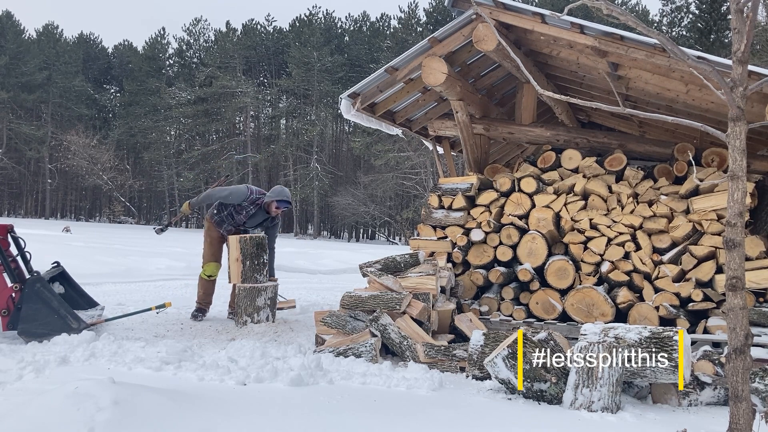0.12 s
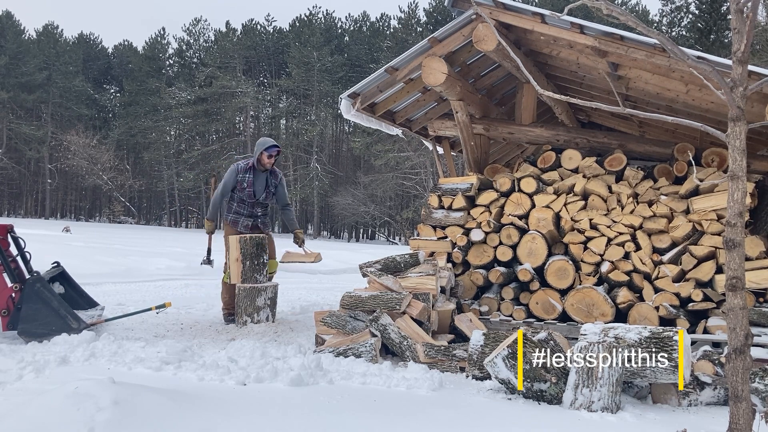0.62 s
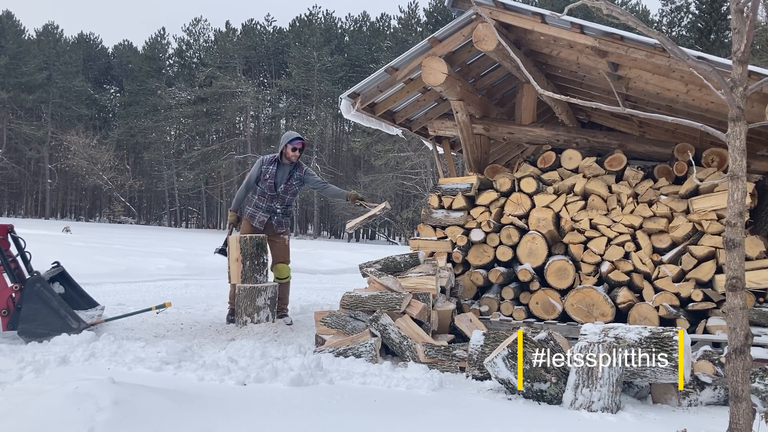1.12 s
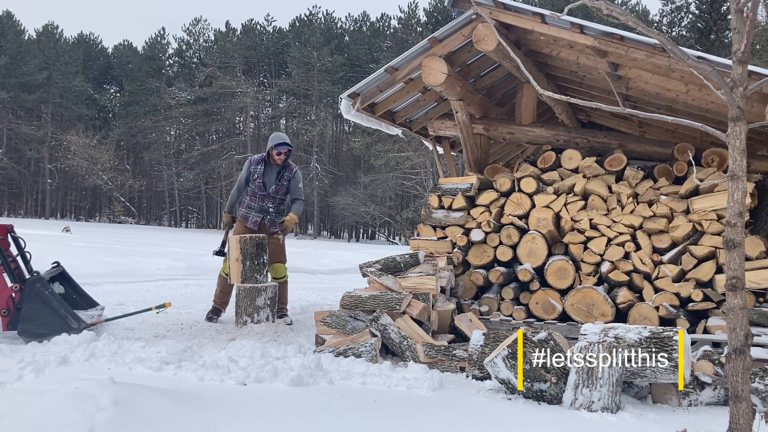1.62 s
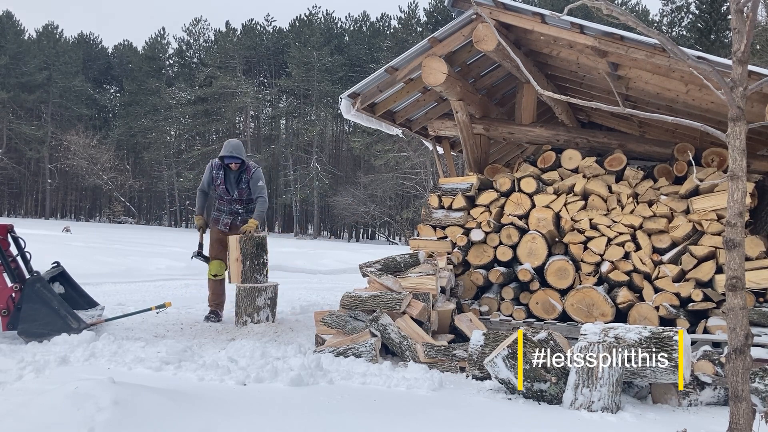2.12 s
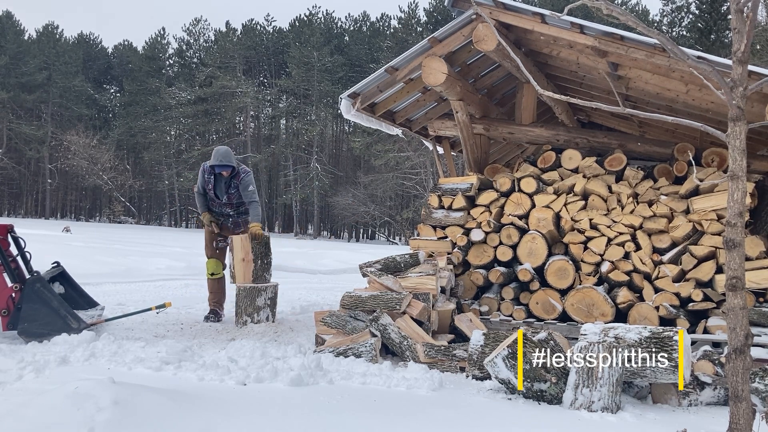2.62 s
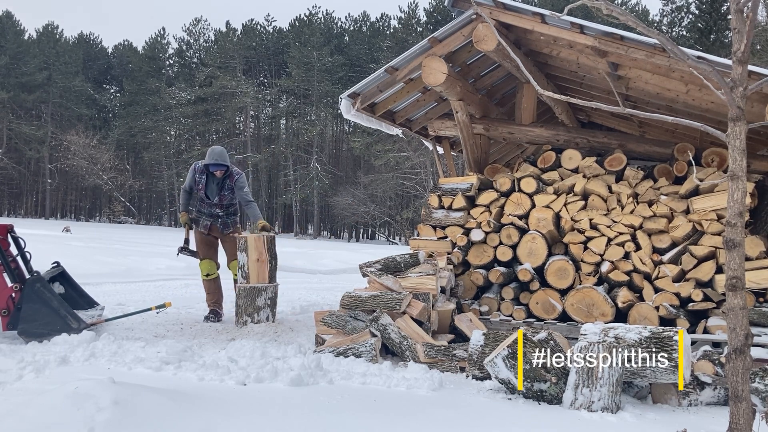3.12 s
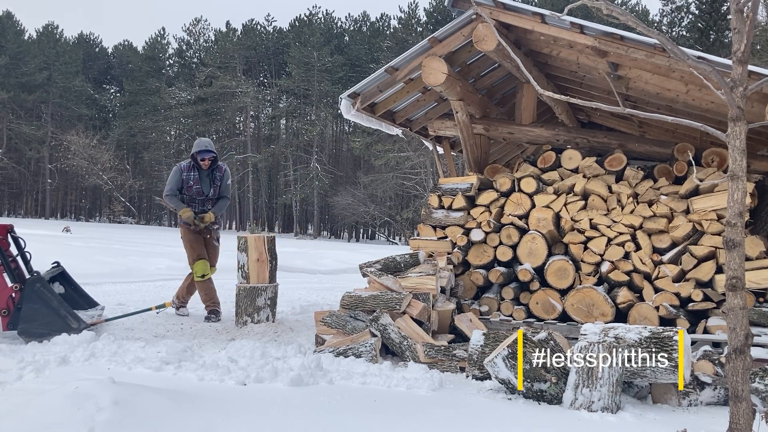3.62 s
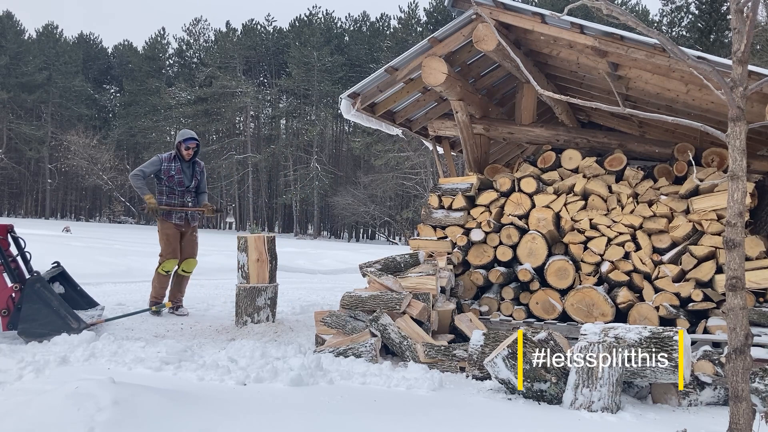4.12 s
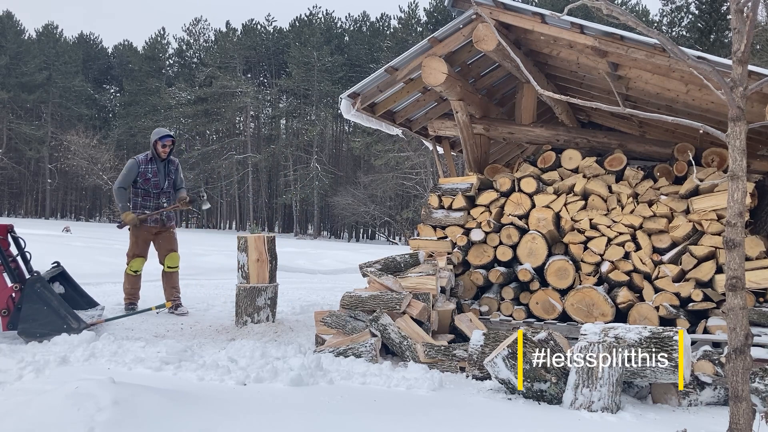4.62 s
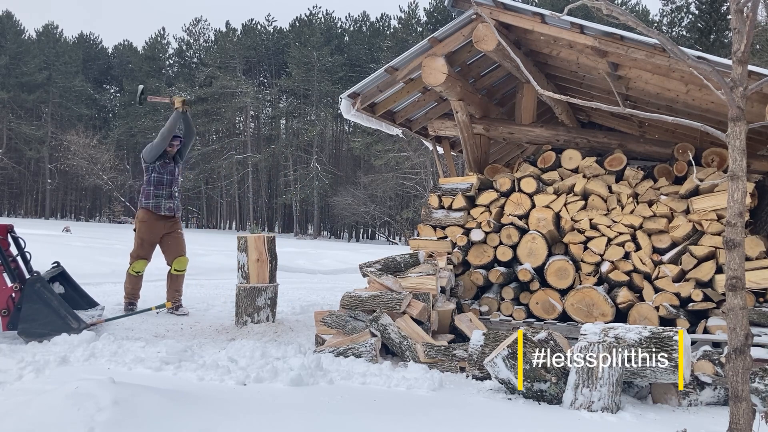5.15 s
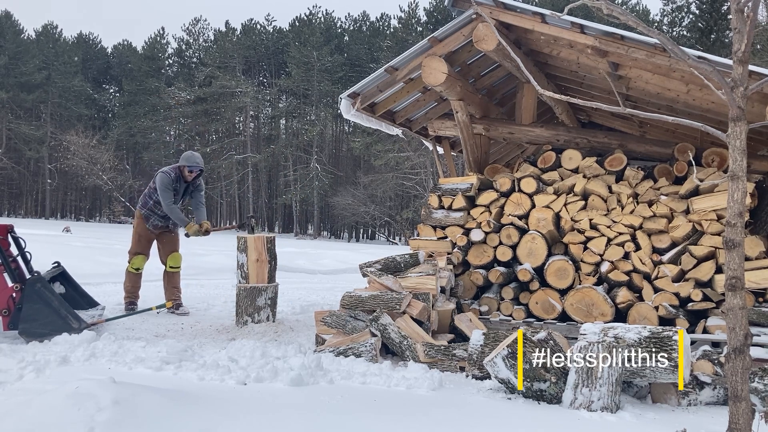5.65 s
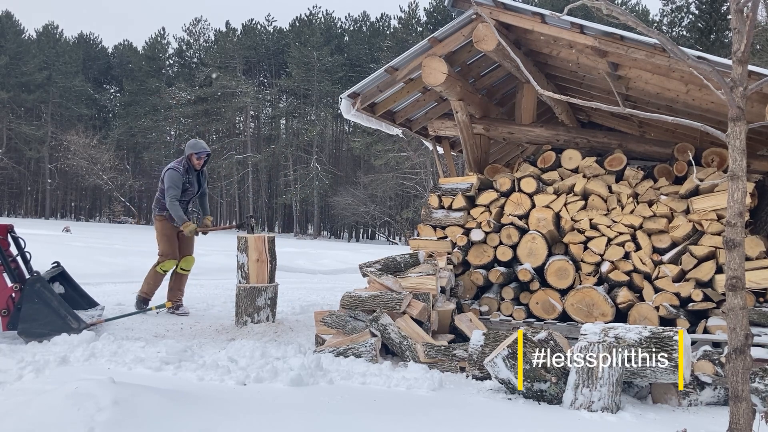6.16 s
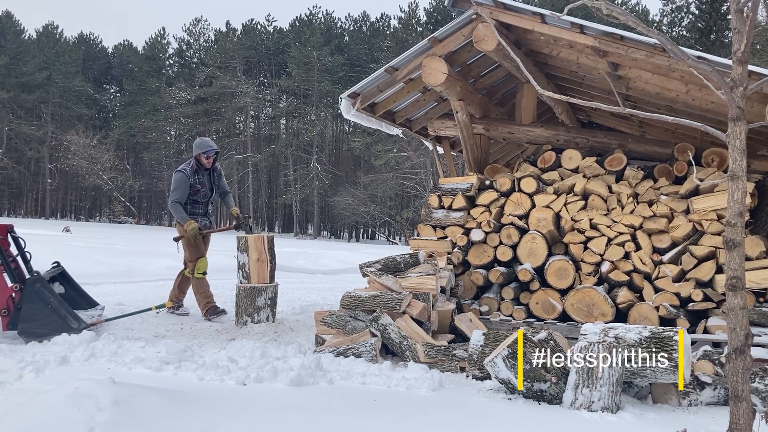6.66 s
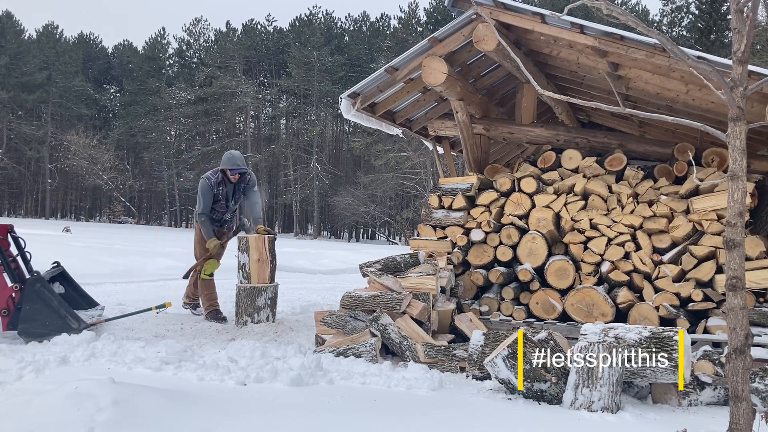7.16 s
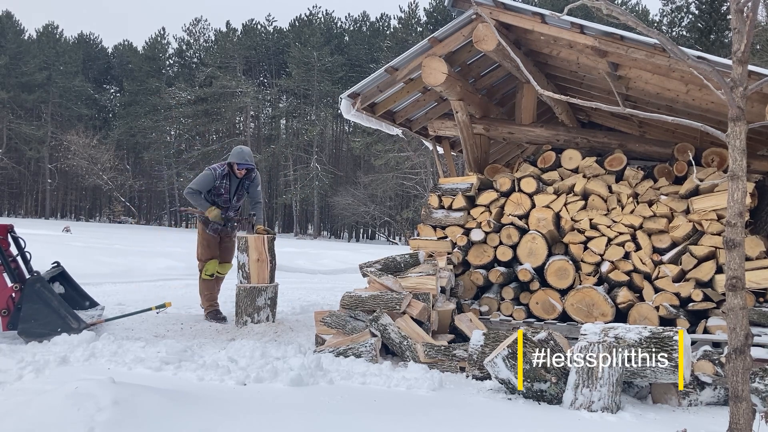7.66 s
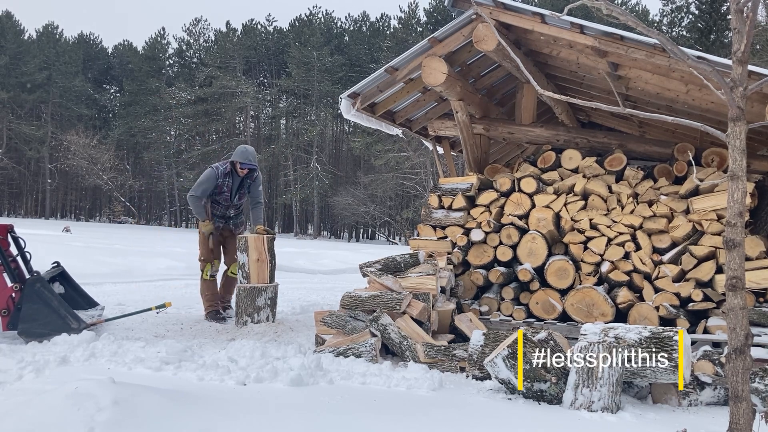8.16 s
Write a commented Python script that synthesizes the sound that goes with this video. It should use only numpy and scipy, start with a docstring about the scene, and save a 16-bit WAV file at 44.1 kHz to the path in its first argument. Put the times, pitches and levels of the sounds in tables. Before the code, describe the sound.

Outdoors in a snowy yard, over faint low wind and hiss, sleeves rustle and a split log lands on a woodpile with a hollow clunk and small clatter. Boots crunch and squeak in packed snow, then a single loud, sharp axe crack bursts out with a short woody thump, splinter clicks and an echo off logs and trees. Soft scuffs and a lighter knock follow. Heard by a phone some metres away.

```python
"""Firewood splitting in a snowy yard: decaying modes and noise cracks make the wood knocks; a tossed log
hits the pile, then the axe lands once, with splinter clicks after it and a diffuse tail off logs and trees.
Noise puffs snap, slow sines thump; swelling noise gives cloth, bark, snow crunch and squeaks over low wind.
A phone some metres off adds hiss; now and then the sound under 8 kHz drops away."""
import sys
import numpy as np
from scipy import signal
from scipy.fft import rfft, irfft, next_fast_len
from scipy.io import wavfile
from scipy.ndimage import uniform_filter1d

SR = 44100
rng = np.random.default_rng(int(sys.argv[2]) if len(sys.argv) > 2 else 0)


def put_to_file(sound):
    """Save the sound as 16-bit audio at rate SR, in the file named by the first command-line argument."""
    columns = np.atleast_2d(sound).T  # one column per channel
    safe = np.clip(columns, -1, 1)
    whole_steps = np.round(safe * 32767)
    wavfile.write(sys.argv[1], SR, whole_steps.astype(np.int16))


def decibels_to_gain(level_db):
    """Convert a level in decibels to a linear amplitude gain (20 dB per decade)."""
    exponent = np.asarray(level_db, float) / 20
    return 10 ** exponent


N = 364707

# parts of wood knocks, several rows to a hit; log lands on the pile from 1.55 s, axe from 5.63 s:
# [t/s, ring level/dB, lowest mode f/Hz, crack level/dB, crack t60/s]
KNOCK_PARTS = [(1.175, -41, 2170, -60, 0.036), (1.553, -47, 490, -38, .16), (1.5575, -34, 790, -56, .1),
               (1.561, -35, 3000, -48, .06), (1.5784, -23, 418, -38.5, 0.029),
               (1.594, -35.5, 790, -60.5, 0.04), (1.608, -37, 770, -72, .05), (1.63, -45, 755, -73, 0.046),
               (1.778, -51, 780, -56, 0.029), (2.5976, -44.5, 1640, -60, 0.022),
               (3.1381, -33, 1476, -54.5, 0.071), (5.6302, -17.5, 788, 0, 0.014),
               (5.6308, -5.5, 990, -59, .03), (5.633, -14, 616, -54, .03), (5.669, -38.5, 1750, -60, .05),
               (5.675, -35.5, 1330, -49, .05), (5.672, -31, 590, -47, 0.13), (5.692, -38.5, 246, -47, 0.23),
               (5.787, -45.5, 1000, -61.5, .04), (5.833, -50.5, 845, -55, 0.042),
               (5.9065, -49.5, 644, -52, 0.032), (7.0795, -47, 1320, -60.5, .042),
               (7.1909, -31, 1096, -38, 0.04), (7.1962, -33, 1180, -51, 0.019), (7.199, -53, 615, -44, 0.1)]
PORT_LAG_MS = -0.14  # wood and squeaks; positive = left later
PATCHY_DB = 2  # unevenness of crunch and scuff


def evened(x):
    """Scales to rms 1."""
    return x / np.sqrt(np.mean(x ** 2) + 1e-20)


def read(points, hz):
    """Reads a spectrum table on a log-frequency axis."""
    f, value = np.transpose(points)
    return np.interp(np.log(hz + 1), np.log(f + 1), value)


def add(mix, start_s, sound):
    """Mixes a stereo sound in at start_s."""
    part = mix[:, round(start_s * SR):][:, :sound.shape[1]]
    part += sound[:, :part.shape[1]]


def coloured(x, gain):
    """Filters along time by gain(hz), real or complex."""
    size = next_fast_len(x.shape[-1] + 512)
    hz = np.fft.rfftfreq(size, 1 / SR)
    return irfft(rfft(x, size) * gain(hz), size)[..., :x.shape[-1]]


def placed(x, lag_ms):
    """One source at two ports, lag_ms apart (positive = left later)."""
    delay_s = np.array([[1], [-1]]) * lag_ms / 2000
    return coloured(np.pad(x, (4, 32)), lambda hz: np.exp(-2j * np.pi * hz * delay_s))


def diffuse(spectrum, patchy_db, flicker_db, lag_ms):
    """Stereo noise of rms 1 from random short-time spectra, with patches and broadband flicker."""
    # left-right likeness of diffuse sound: [f/Hz, correlation]
    likeness = [(60, .88), (300, .8), (700, .5), (1500, .5), (3000, .55), (7000, .6)]
    hz = np.fft.rfftfreq(512, 1 / SR)
    frames = N // 128 + 5
    a, b, c, d, raw = rng.standard_normal((frames, len(hz), 5)).T
    flicker = evened(uniform_filter1d(raw[0], size=3))
    patches = uniform_filter1d(raw, size=6, axis=0)
    patches = evened(uniform_filter1d(patches, size=20, axis=1))
    same = np.clip(read(likeness, hz), -1, 1)[:, None]
    turn = np.exp(2j * np.pi * hz * lag_ms / 1000)[:, None]
    left = a + 1j * b
    right = same * turn * left + np.sqrt(1 - same ** 2) * (c + 1j * d)
    z = np.array([left, right]) * decibels_to_gain(patchy_db * patches + flicker_db * flicker)
    x = signal.istft(z, nperseg=512, noverlap=384)[1][:, :N]
    return evened(coloured(x, lambda f: decibels_to_gain(read(spectrum, f))))


def wind():
    """Low lumpy rumble of air over snow and trees."""
    # relative spectrum: [f/Hz, density/dB]
    wind_colour = [(15, -48), (28, -26), (42, -8.5), (62, -2), (82, -4), (168, -10.5), (536, -13.5),
                   (580, -15.5), (738, -19), (849, -20.5), (3000, -44), (3900, -64), (6600, -120)]
    # [t/s, level/dB]
    gusts = [(0, -61.5), (.8, -63), (1.5, -64), (2.3, -62), (2.8, -61), (3.5, -62.5), (4.1, -61),
             (4.7, -59), (5.3, -62.5), (5.9, -61.5), (6.25, -59), (6.8, -60.5), (7.5, -61.5), (8.27, -62.5)]
    s, db = np.transpose(gusts)
    level_db = np.interp(np.arange(N) / SR, s, db)
    return decibels_to_gain(level_db) * diffuse(wind_colour, 1.4, 0.32, -0.23)


def yard():
    """Cracks come back diffuse: quick scatter off stacked logs, longer off the trees, decay set by band."""
    # tree line: [f/Hz, t60/s]
    tree_t60 = [(60, 0.79), (250, 0.46), (1000, 0.62), (3000, 0.55), (6000, 0.48), (12000, 0.44)]
    # tail relative to the crack: [f/Hz, density/dB]
    tail_colour = [(60, -26), (150, -24), (500, -22.5), (1500, -34.5), (3000, -33), (6000, -43.5),
                   (10000, -45.5), (16000, -57)]
    logs_t60_s, logs_db = 0.12, 19.5  # level above the tree line
    delay_s, onset_s = 0.003, 0.0054  # tail starts a few ms after each crack
    noise = diffuse([(20, 0.014), (20000, 0.0059)], 0.5, 0.46, -0.13)
    hz, t, z = signal.stft(noise, SR, nperseg=256, noverlap=192)
    trees_t60_s = read(tree_t60, hz)[:, None]
    power = 0
    for s, _, _, crack_db, _ in KNOCK_PARTS:
        since = np.maximum(t - s - delay_s, 0)
        trees = decibels_to_gain(-60 * since / trees_t60_s) ** 2
        logs = decibels_to_gain(logs_db - 60 * since / logs_t60_s) ** 2
        power = power + decibels_to_gain(crack_db) ** 2 * (trees + logs) * np.clip(since / onset_s, 0, 1)
    z *= decibels_to_gain(read(tail_colour, hz))[:, None] * np.sqrt(power)
    return signal.istft(z, SR, nperseg=256, noverlap=192)[1][:, :N]


def swells(rows):
    """Gain of movements that rise to a peak and die away; overlaps add in power."""
    swell_db = 20  # gained over a rise, lost over a fall
    s, rise, fall, db = np.transpose(rows)[..., None]
    t = np.arange(0, N / SR + .002, .001)
    away = np.maximum((s - t) / np.maximum(rise, .002), (t - s) / np.maximum(fall, .002))
    power = (decibels_to_gain(db - swell_db * away) ** 2).sum(axis=0)
    return np.interp(np.arange(N) / SR, t, np.sqrt(power))


def grit():
    """Stick-slip gain of rms 1: rubbing catches in small random jerks, each decaying exponentially."""
    jerks_per_s, jerk_db, decay_s = 120, -2.5, 0.0014  # jerk_db before scaling to rms 1
    jerks = (rng.random(N) < jerks_per_s / SR) * rng.exponential(1, N)
    return evened(1 + decibels_to_gain(jerk_db) * signal.lfilter([1], [1, -np.exp(-1 / (decay_s * SR))], jerks))


def moves():
    """Cloth swishes bright and smooth; packed snow crunches low; gloves scuff bark between the two."""
    # relative spectra: [f/Hz, density/dB]
    cloth_colour = [(1500, 14.5), (4000, -5.5), (7000, 6), (11000, 6.5), (14000, -1), (15800, -1),
                    (17000, -24)]
    snow_colour = [(300, -24), (800, -5), (1300, 4.5), (1900, -4), (2500, -6), (3500, -31)]
    bark_colour = [(1500, -27.5), (2500, -13), (3300, 3), (4500, 2.5), (6000, -19.5), (8000, -18)]
    # sleeves and gloves rubbing: [peak t/s, rise/s, fall/s, cloth level/dB, bark level/dB]
    rubs = [(.855, 0.015, 0.082, -63.5, -74), (.898, .05, 0.019, -63.5, -70),
            (1.165, 0.085, .02, -81, -76.5), (1.19, 0.022, 0.087, -80, -79),
            (1.244, 0.14, 0.05, -64, -75.5), (1.6, .01, 0.081, -77, -81), (1.69, 0.27, 0.081, -66, -94),
            (1.806, 0.033, 0.028, -53.5, -86), (1.839, .02, 0.067, -58, -95.5),
            (2.12, 0.058, 0.029, -65, -73), (2.2, 0.017, 0.15, -71.5, -90),
            (2.488, 0.068, .04, -66.5, -69.5), (2.596, .01, 0.052, -78, -77), (2.82, 0.34, 0.3, -75, -75.5),
            (3.135, 0.011, 0.055, -67, -68), (3.18, 0.07, .03, -67.5, -77), (3.387, 0.02, 0.11, -62.5, -76),
            (3.57, 0.058, .2, -66, -86), (3.648, .03, 0.093, -67, -75), (3.798, 0.093, 0.15, -69, -80),
            (3.932, 0.086, 0.36, -60, -75), (4.06, .3, 0.43, -65, -76), (4.242, 0.28, .15, -71.5, -84),
            (4.722, 0.21, .055, -73.5, -76), (5.042, 0.17, .1, -66, -71), (5.115, 0.12, .08, -63, -68),
            (6.29, .1, 0.045, -70, -80), (6.7, .015, 0.067, -70.5, -75.5), (7.121, .01, .025, -67, -75.5),
            (7.78, 0.015, 0.096, -70, -81.5)]
    # boots pressing packed snow: [peak t/s, rise/s, fall/s, crunch level/dB]
    steps = [(.898, 0.16, 0.035, -67), (1.168, 0.024, 0.047, -81), (2.15, 0.044, 0.78, -75.5),
             (2.488, 0.48, 0.055, -76), (2.596, .025, 0.15, -73), (2.82, 0.88, 0.77, -70),
             (3.15, .02, .12, -70), (3.34, .03, .07, -81), (3.486, 0.27, .2, -67),
             (3.72, 0.55, 0.14, -73.5), (3.932, 0.13, 0.66, -70), (4.1, 0.31, 0.71, -63),
             (4.59, 0.12, 0.44, -71.5), (4.95, 0.14, 0.18, -71.5), (5.124, .02, 0.13, -69),
             (6.085, .2, .4, -63.5), (6.29, 0.14, .02, -70), (6.72, 0.071, 0.48, -76.5),
             (7.112, 0.24, 0.13, -69), (7.17, 0.076, 0.039, -65), (7.686, 0.035, 0.052, -66.5),
             (7.836, .1, 0.071, -72.5)]
    cloth_rows = [(s, rise, fall, db) for s, rise, fall, db, _ in rubs]
    bark_rows = [(s, rise, fall, db) for s, rise, fall, _, db in rubs]
    cloth = swells(cloth_rows) * diffuse(cloth_colour, 2.6, 1.5, -0.13)
    snow = swells(steps) * diffuse(snow_colour, PATCHY_DB, 1.8, -0.19)
    bark = swells(bark_rows) * diffuse(bark_colour, PATCHY_DB, 2.7, -0.15)
    return cloth + grit() * (bark + snow)


def squeaks():
    """Cold snow under a boot: narrow bands of noise that swell and fade."""
    # [from t/s, to t/s, band level/dB, centre f/Hz, width at half gain/Hz]
    squeak_rows = [(0.865, 0.924, -85, 4400, 200), (4.09, 4.45, -73.5, 3240, 250),
                   (4.273, 4.45, -82, 4950, 200), (4.877, 5.182, -78, 3160, 246),
                   (5.966, 6.221, -72, 2450, 350), (6.229, 6.3, -91, 5755, 249),
                   (6.232, 6.301, -82, 3910, 249)]
    out = np.zeros((2, N))
    noises = rng.standard_normal((len(squeak_rows), SR // 2))
    for (a, b, db, centre_hz, width_hz), noise in zip(squeak_rows, noises):
        band = evened(coloured(noise, lambda hz: 1 / (1 + (2 * (hz - centre_hz) / width_hz) ** 2)))
        band = band[:round((b - a) * SR)]
        add(out, a, placed(decibels_to_gain(db) * band * np.hanning(len(band)) ** 0.82, PORT_LAG_MS))
    return out


def snaps():
    """Bark, ice and splinters snapping: decaying noise puffs, about 0.6 octave wide at half gain."""
    # [t/s, level/dB, centre f/Hz]
    snap_rows = [(.3294, -63, 10600), (.3655, -59.5, 10200), (.8927, -59, 7590), (1.0496, -60, 11900),
                 (1.0694, -66, 11400), (1.1263, -62, 11700), (1.144, -61, 8220), (1.1745, -41.5, 8700),
                 (1.6437, -51, 8140), (1.6742, -43.5, 8100), (1.6745, -41, 4200), (1.7094, -58, 11700),
                 (1.7799, -50.5, 11500), (1.7975, -52, 11250), (1.803, -30.5, 4000), (1.8425, -48, 11200),
                 (1.843, -32, 3300), (2.4194, -65, 10200), (2.4638, -62, 4660), (2.4798, -50.5, 9700),
                 (2.598, -57, 10800), (3.1344, -51, 9900), (3.1404, -50.5, 7250), (3.1755, -53, 8400),
                 (3.3844, -56, 7350), (3.6494, -59, 6750), (4.4374, -68.5, 5000), (4.679, -64, 7000),
                 (5.588, -58, 8600), (5.7805, -50, 12000), (5.815, -62.5, 11800), (5.8443, -54, 7010),
                 (5.8793, -51.5, 2920), (6.6947, -53.5, 6800), (6.9203, -62, 6800), (7.2017, -37, 7600),
                 (7.3387, -55.5, 5000), (7.6804, -63, 3190), (7.7833, -57.5, 6830)]
    t60_s, lead_s = 0.0094, 0.001  # puffs start lead_s ahead of t
    out, t = np.zeros((2, N)), np.arange(2000) / SR
    puffs = rng.standard_normal((len(snap_rows), len(t)))
    for (s, db, centre_hz), puff in zip(snap_rows, puffs):
        band = coloured(puff, lambda hz: 1 / (1 + (np.log((hz + 1) / centre_hz) / 0.22) ** 2) ** 0.98)
        add(out, s - lead_s, placed(decibels_to_gain(db - 60 * t / t60_s) * evened(band), -0.11))
    return out


def thumps():
    """Block, ground and boots thumping: a few slow cycles under a half-sine envelope."""
    # [t/s, peak level/dB, f/Hz, length/s]
    thump_rows = [(1.578, -35.5, 75, 0.04), (1.579, -35, 205, 0.013), (5.013, -39.5, 62, 0.014),
                  (5.624, -21, 164.3, 0.025), (5.622, -24.5, 260, 0.015), (5.68, -38, 101, .035),
                  (5.708, -44.5, 66, 0.16), (6.029, -46.5, 60, 0.047), (7.204, -46, 122, 0.014),
                  (7.228, -39.5, 70, 0.03)]
    out = np.zeros((2, N))
    for s, db, hz, length_s in thump_rows:
        t = np.arange(0, length_s, 1 / SR)
        thump = decibels_to_gain(db) * np.sin(np.pi * t / length_s) * np.sin(2 * np.pi * hz * t)
        add(out, s, thump[None].repeat(2, axis=0))
    return out


def splinters():
    """The split runs on after the axe: scattered decaying fibre clicks of random size and pitch."""
    start_s, lasts_s, t60_s = 5.665, 0.27, 0.5
    base_db = -50.5  # before the random size
    out, t = np.zeros((2, N)), np.arange(400) / SR
    for when, size, pitch in rng.random((50, 3)):
        since = lasts_s * when
        hz = 500 * 8 ** pitch
        click = np.sin(2 * np.pi * hz * t) * decibels_to_gain(-60 * t * hz / 9.5)
        db = base_db - 60 * since / t60_s - 3.8 * np.log(size + .01)
        add(out, start_s + since, placed(decibels_to_gain(db) * click, PORT_LAG_MS))
    return out


def knocks():
    """Wood struck: each row adds ringing modes and a crack of fibres in uneven noise bursts."""
    # wood modes: [f/lowest f, relative level/dB, cycles to -60 dB]
    modes = [(1, 1, 19), (1.19, 2.5, 19.5), (1.46, 0, 24), (1.7, -6, 26.5), (1.961, -5.5, 49)]
    # relative spectrum before tilt: [f/Hz, density/dB]
    crack_colour = [(100, -33), (500, 0), (1200, -3), (3000, -9.5), (6000, -19.5), (8000, -15.5),
                    (10000, -15.5), (13000, -19.5), (15500, -23.5), (17000, -38)]
    # softer cracks quieten upper modes: dB/octave per dB under a hard crack
    hard_crack_db, upper_slope = -41, 1.5
    # harder cracks are brighter: dB/octave per dB above a soft crack
    soft_crack_db, tilt_slope = -35, 0.073
    out, t = np.zeros((2, N)), np.arange(8000) / SR
    noises = rng.standard_normal((len(KNOCK_PARTS), 4, len(t)))
    for (s, ring_db, hz, crack_db, t60_s), noise in zip(KNOCK_PARTS, noises):
        upper_db = upper_slope * min(crack_db - hard_crack_db, 0)
        ring = 0
        for k, db, cycles in modes:
            mode_db = db + upper_db * np.log2(k) - 60 * t * hz * k / cycles
            ring = ring + decibels_to_gain(mode_db) * np.sin(2 * np.pi * hz * k * t)
        ring *= 1 - np.exp(-t * hz)  # onset takes about a cycle
        tilt_db = tilt_slope * (crack_db - soft_crack_db)
        fibres = evened(coloured(
            noise[:3], lambda f: decibels_to_gain(read(crack_colour, f) + tilt_db * np.log2(f / 1000 + 0.12))))
        fibres *= decibels_to_gain(5.1 * evened(uniform_filter1d(noise[3], size=30)))
        fade = decibels_to_gain(crack_db - 60 * t / t60_s) * (1 - np.exp(-t / 0.0021))
        # the row sets the energy, chance the grain
        fibres = evened(fibres * fade / fade.max()) * np.sqrt(np.mean(fade ** 2))
        add(out, s, placed(decibels_to_gain(ring_db) * ring + fibres[0], PORT_LAG_MS))
        add(out, s, 0.7 * fibres[1:])  # nearby snow and logs scatter differently to each port
    return out


def scene():
    """All sources at the two ports."""
    return wind() + moves() + squeaks() + snaps() + thumps() + knocks() + splinters() + yard()


def dipped(x):
    """Briefly lowers the sound under 8 kHz, by a frequency-dependent share of each drop."""
    # [from t/s, to t/s, drop before share/dB, fade/s]
    dips = [(1.586, 2.12, -14.5, 0.0023), (1.693, 2.103, -8, 0.048), (5.625, 5.667, -15.5, 0.014),
            (6.305, 6.598, -27.5, 0.022), (7.233, 7.268, -25, 0.022)]
    # [f/Hz, share of the drop]
    dip_share = [(40, 1.5), (150, 0.82), (500, 1.01), (7000, 1.8)]
    top_hz = 7923
    hz, t, z = signal.stft(x, SR, nperseg=256, noverlap=192)
    drop_db = 0
    for a, b, db, fade_s in dips:
        drop_db = drop_db + db * np.clip(np.minimum(t - a, b - t) / fade_s + .5, 0, 1)
    share = read(dip_share, hz) * (hz < top_hz)
    z = z * decibels_to_gain(share[:, None] * drop_db)
    return signal.istft(z, SR, nperseg=256, noverlap=192)[1][:, :N]


def low_pass(x):
    """Removes everything above the highest recorded frequency."""
    return signal.sosfilt(signal.butter(12, 16800, fs=SR, output="sos"), x)


def record(dry):
    """Drops, microphone hiss, left treble replacing the right's with a turning phase, top shelved off."""
    # microphone hiss, relative spectrum: [f/Hz, density/dB]
    hiss_colour = [(20, 3.5), (500, -0.5), (1500, 2.5), (4000, 3.5), (9000, 2), (14000, 2.5), (17000, -3.5)]
    hiss_db = -83.5
    one_port_hz = 6400  # treble from one port above
    turn_hz, in_phase_hz = 4450, 6950  # one phase turn per turn_hz
    edge_hz, edge_db = 15800, -19

    def treble(hz):  # soft hand-over, equal power
        return np.sin(np.pi / 4 * (1 + np.tanh((hz - one_port_hz) / 150)))

    def turn(hz):
        return np.exp(2j * np.pi * (hz - in_phase_hz) / turn_hz)

    left, right = dipped(dry) + decibels_to_gain(hiss_db) * diffuse(hiss_colour, 0.72, .3, 0.056)
    right_low = coloured(right, lambda hz: np.sqrt(1 - treble(hz) ** 2))
    right_high = coloured(left, lambda hz: treble(hz) * turn(hz))
    x = np.array([left, right_low + right_high])
    x = coloured(x, lambda hz: decibels_to_gain(edge_db * np.clip((hz - edge_hz) / 300, 0, 1)))
    return low_pass(x)


dry = scene()
out = record(dry)
put_to_file(out)
```